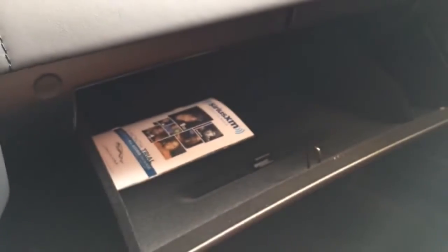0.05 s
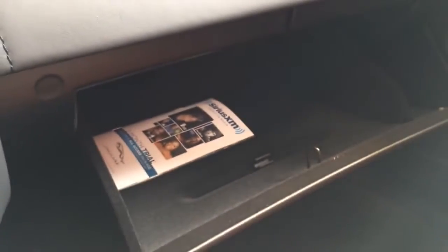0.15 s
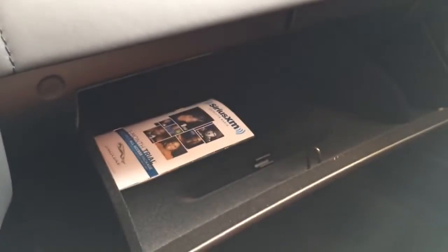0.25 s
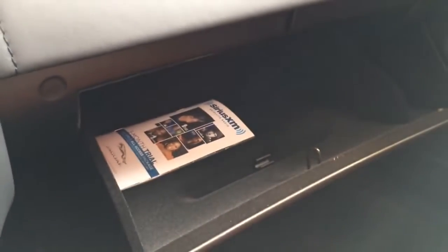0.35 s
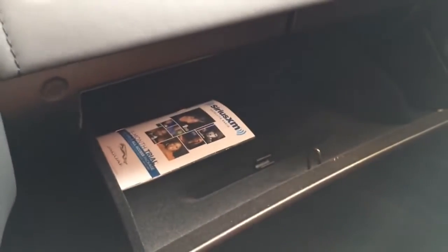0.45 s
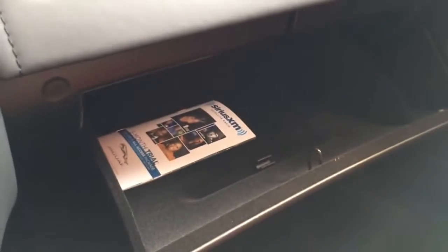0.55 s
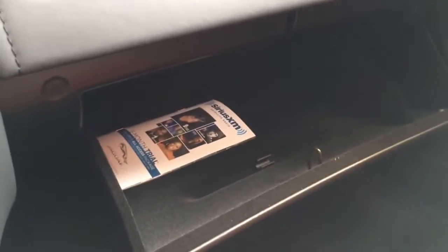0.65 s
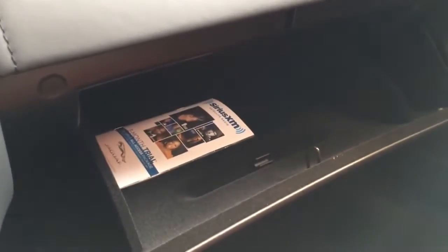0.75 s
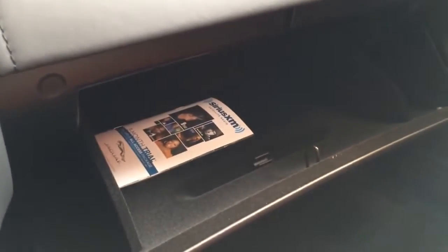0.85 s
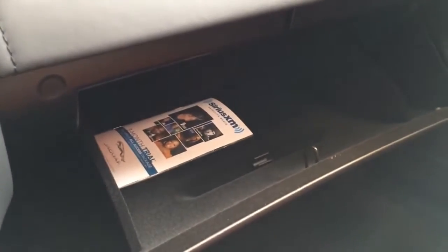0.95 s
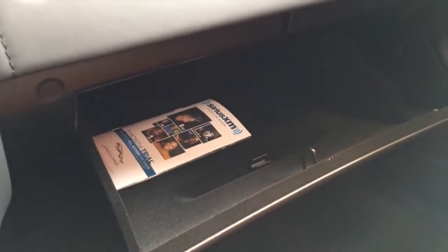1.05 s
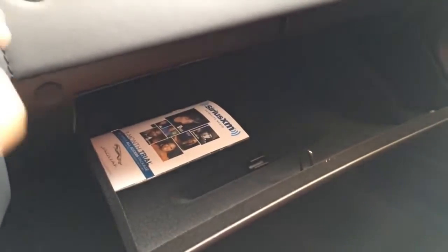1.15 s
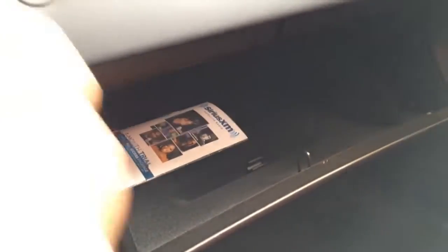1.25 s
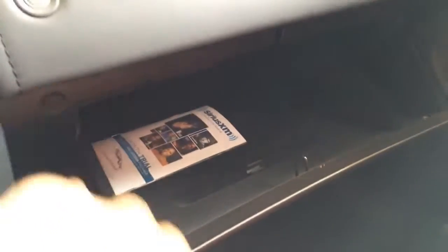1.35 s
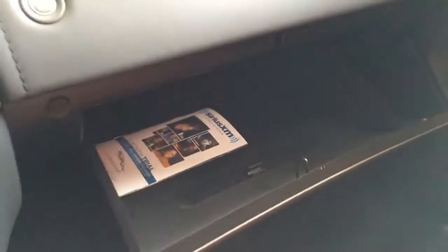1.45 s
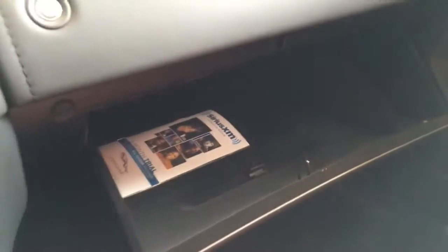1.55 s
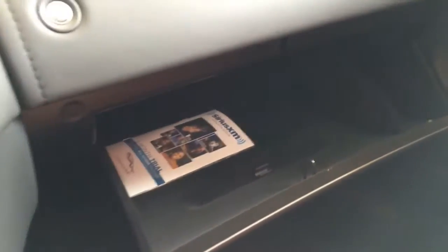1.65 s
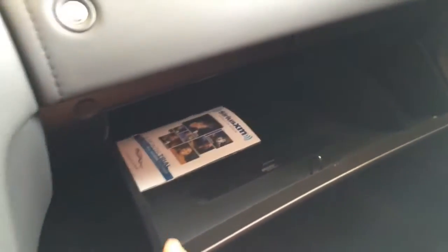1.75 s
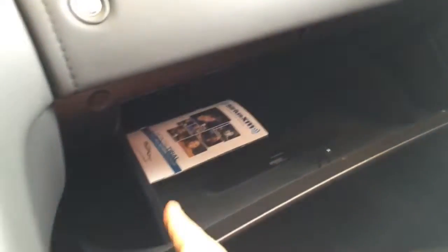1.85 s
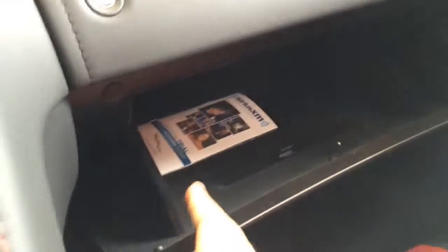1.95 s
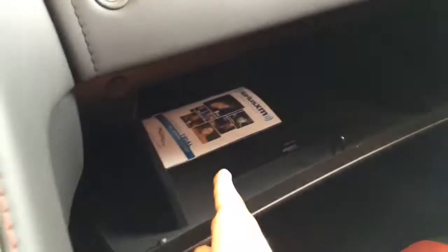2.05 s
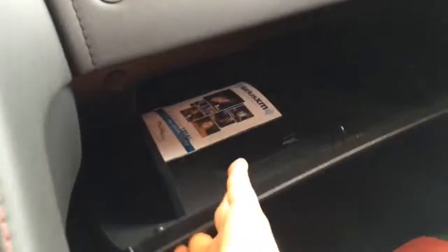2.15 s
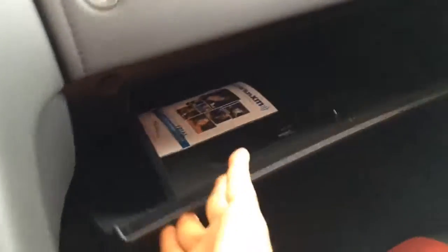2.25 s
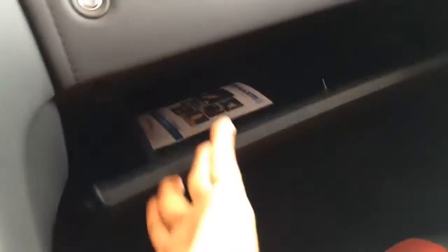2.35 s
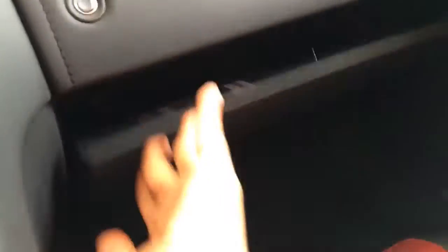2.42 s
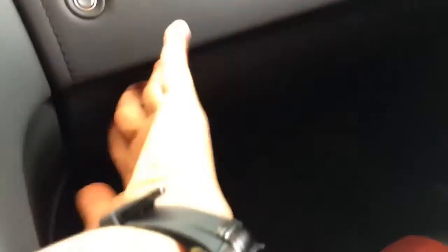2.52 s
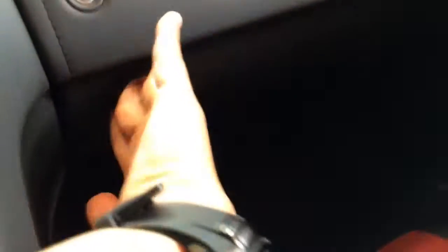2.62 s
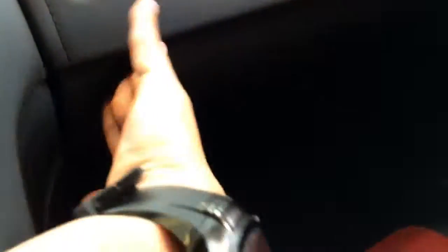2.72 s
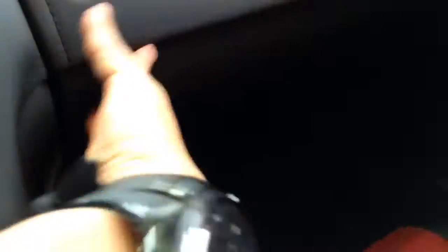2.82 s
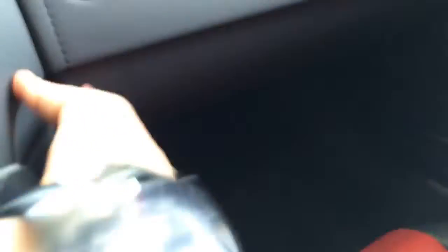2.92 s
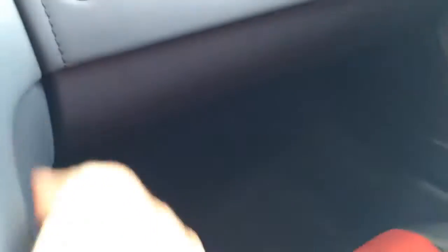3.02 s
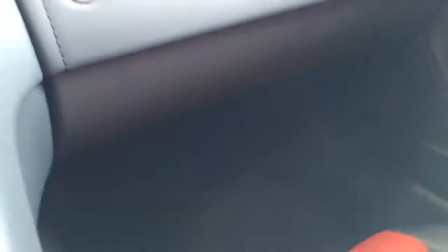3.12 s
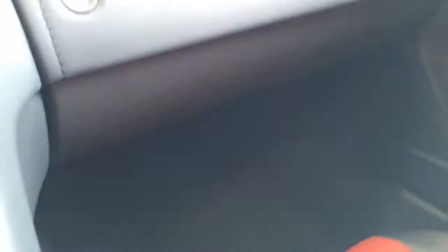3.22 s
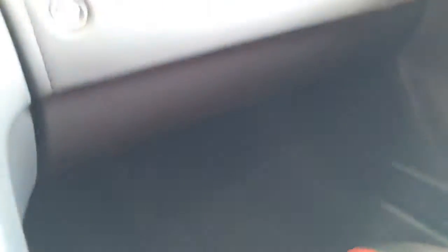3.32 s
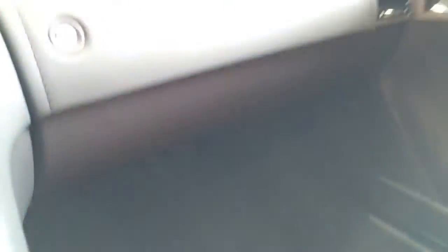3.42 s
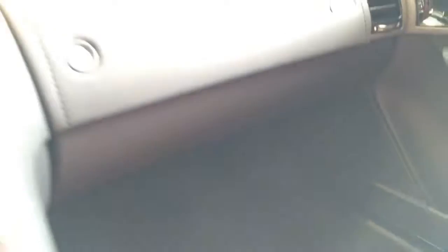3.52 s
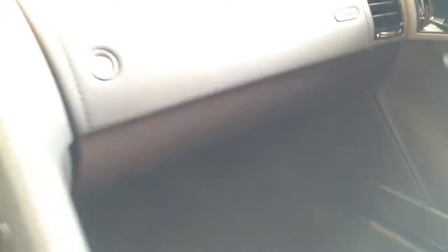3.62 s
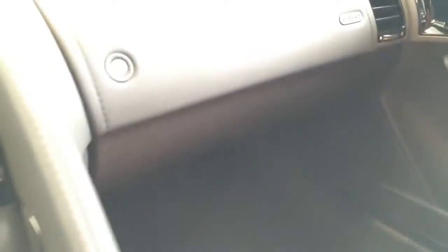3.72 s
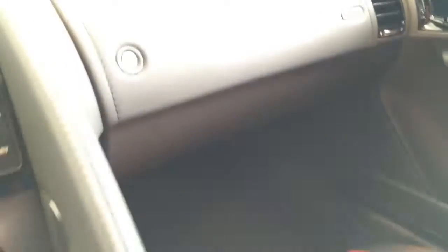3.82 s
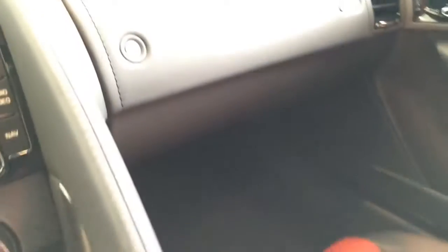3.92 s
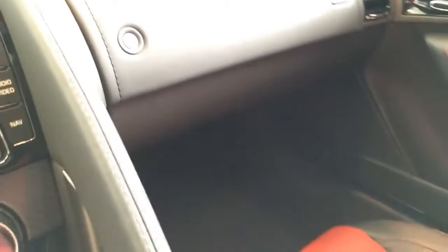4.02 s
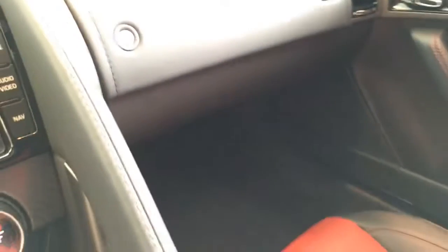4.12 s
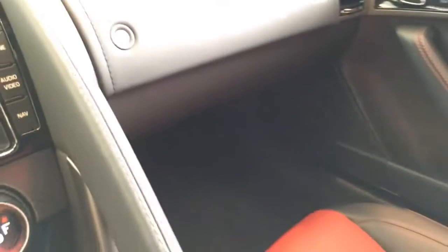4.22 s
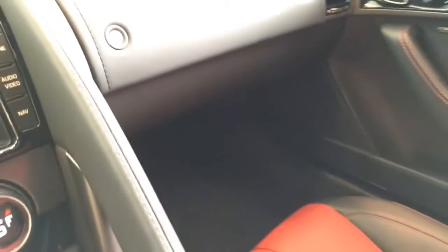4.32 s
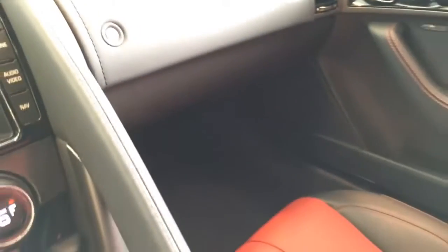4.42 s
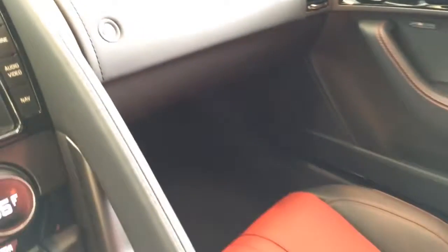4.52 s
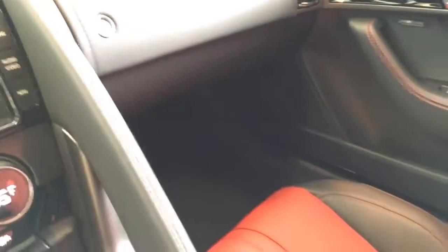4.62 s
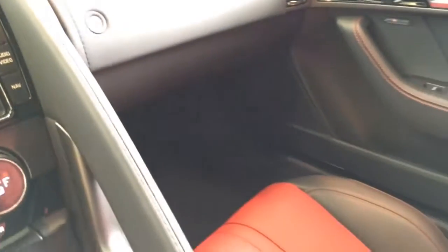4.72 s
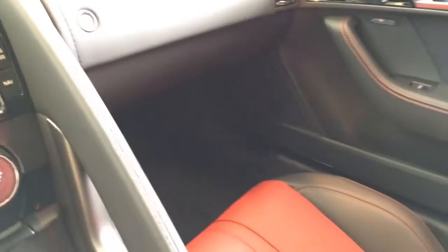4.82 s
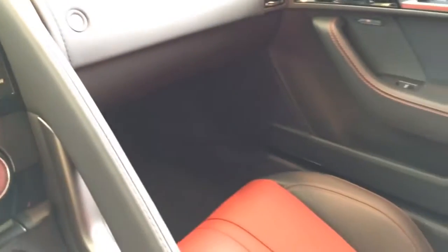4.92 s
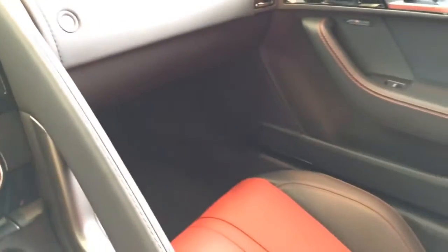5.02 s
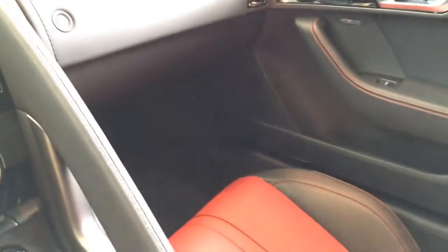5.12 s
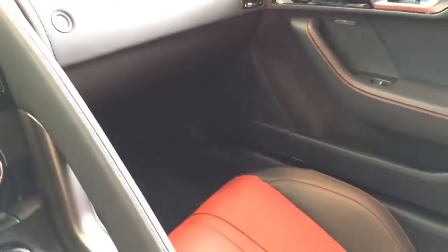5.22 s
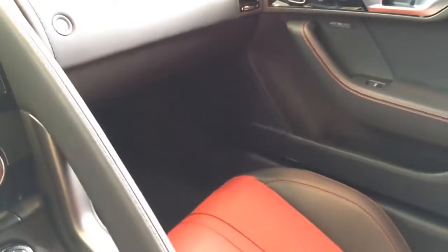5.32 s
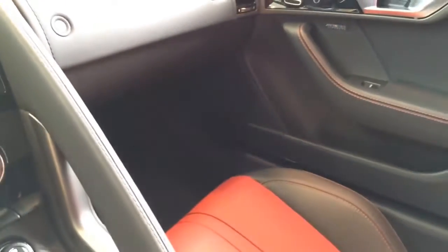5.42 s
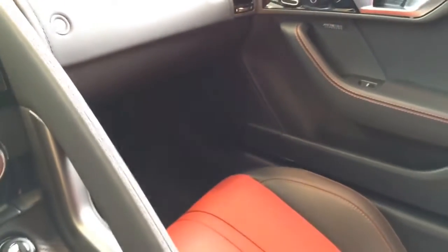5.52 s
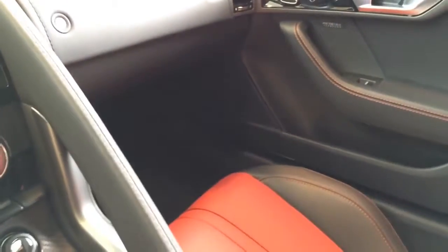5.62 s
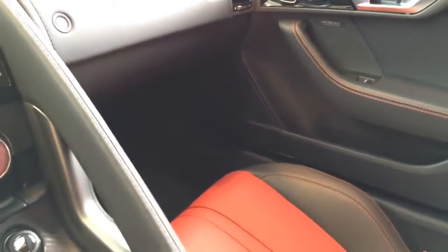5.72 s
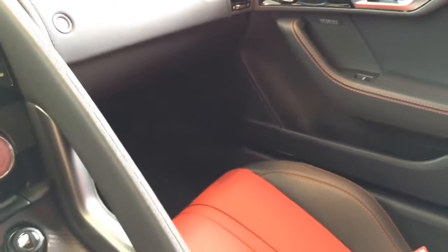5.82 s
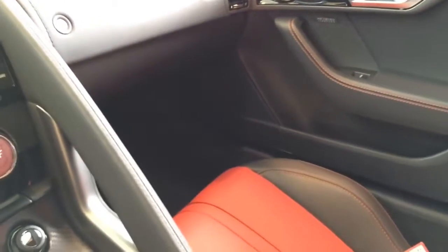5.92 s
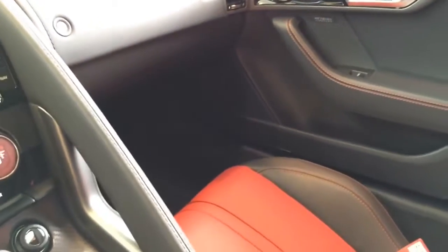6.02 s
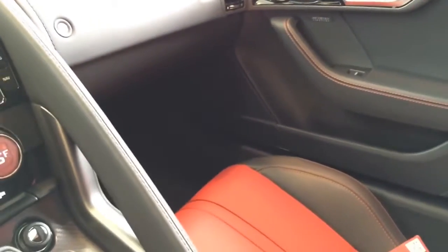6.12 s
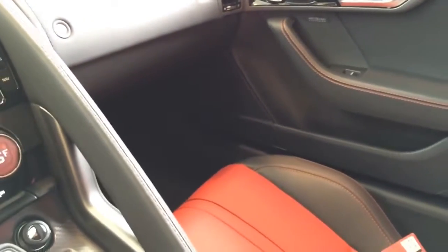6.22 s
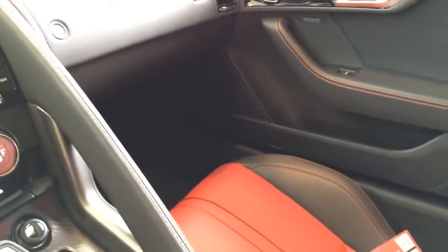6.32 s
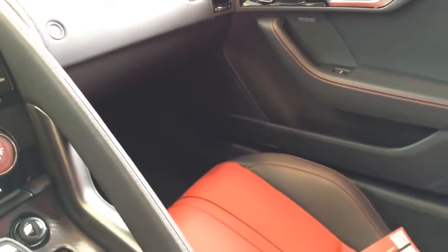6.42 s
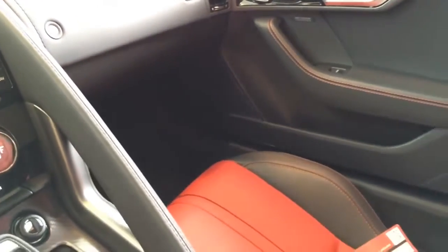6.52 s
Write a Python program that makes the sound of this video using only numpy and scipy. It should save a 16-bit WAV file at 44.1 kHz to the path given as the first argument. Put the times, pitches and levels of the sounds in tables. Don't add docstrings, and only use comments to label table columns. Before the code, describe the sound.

A close handheld microphone in a small, padded car interior picks up faint rumble and hiss. Cloth rubs, low soft bumps and plastic ticks follow, then one loud glove box closing: quick metallic latch chatter merged with a woody thud. Things inside hop for a fraction of a second. Rustling fades away, a lone bump follows, then small dry creaks and near silence.

```python
import sys
import numpy as np
from scipy import signal
from scipy.fft import rfft, irfft, next_fast_len
from scipy.io import wavfile
from scipy.ndimage import map_coordinates

SR = 44100
rng = np.random.default_rng(int(sys.argv[2]) if len(sys.argv) > 2 else 0)


def log_audio(samples):
    frames = np.atleast_2d(samples).T
    limited = np.clip(frames, -1, 1)
    pcm = np.round(limited * 32767).astype(np.int16)
    wavfile.write(sys.argv[1], SR, pcm)


def volts_from_decibels(level):
    exponent = np.asarray(level, float) / 20
    return 10 ** exponent


N = 289398


def unit(x):
    return x / np.sqrt(np.mean(x ** 2) + 1e-20)


def along(points, hz):
    f, v = np.transpose(points)
    return np.interp(np.log(hz + 1), np.log(f + 1), v)


def wobble(rate):
    knots = rng.standard_normal(int(N * rate / SR) + 4)
    return map_coordinates(knots, [np.arange(N) * rate / SR])


def filtered(x, response):
    m = next_fast_len(N + SR // 2)
    return irfft(rfft(x, m) * response(np.fft.rfftfreq(m, 1 / SR)), m)[:N]


def body(peaks):
    def response(f):
        total = 0
        for k, (hz, width, db) in enumerate(peaks):
            peak = 1j * f * width / (hz * hz - f * f + 1j * f * width)
            total = total + (-1) ** k * volts_from_decibels(db) * peak
        return total
    return response


def band(x, hz, spread):
    pole = np.exp(-np.pi * spread * hz / SR)
    return signal.lfilter([1, -1], [1, -2 * pole * np.cos(2 * np.pi * hz / SR), pole ** 2], x)


def narrow(x, hz, spread):
    return unit(band(band(x, hz, spread), hz, spread))


def ring(hz, db, t60, attack, t):
    return volts_from_decibels(db - 60 * t / t60) * np.sin(2 * np.pi * hz * t) * (1 - np.exp(-t / attack))


def dying(level_db, t60):
    hz, t, z = signal.stft(rng.standard_normal(SR // 2), SR, nperseg=128)
    fade_db = along(level_db, hz)[:, None] - 60 * t / along(t60, hz)[:, None]
    tail = signal.istft(z * volts_from_decibels(fade_db), SR, nperseg=128)[1]
    return tail / np.linalg.norm(tail)


def add(track, s, sound):
    track[round(s * SR):][:len(sound)] += sound


def grainy(grain_db, rate):
    return rng.standard_normal(N) * volts_from_decibels(grain_db * wobble(rate))


def stroke(start, peak, stop, db):
    u = np.interp(np.arange(N) / SR, [start, peak, stop], [0, 1, 2])
    bend = np.where(u < 1, 1.23, 0.54)
    return volts_from_decibels(db) * np.abs(np.sin(np.pi * u / 2)) ** bend * (u < 2)


def contacts(events, t60):
    out, t = np.zeros(N + SR), np.arange(SR // 8) / SR
    for s, db, hz, snap_db, snap_hz in events:
        scrape, snap = rng.standard_normal((2, len(t)))
        fade = volts_from_decibels(-60 * t / t60)
        rough = narrow(scrape, hz, 0.81) + 0.103 * narrow(scrape, 2 * hz, 0.79)
        clean = np.sin(2 * np.pi * hz * t)
        knock = (0.81 * rough + 0.92 * clean) * fade * (1 - np.exp(-t / 0.00053))
        bright = narrow(snap, snap_hz, 0.49) * (volts_from_decibels(-60 * t / 0.0047) + 0.48 * fade)
        add(out, s, volts_from_decibels(db - 7.5) * (knock + volts_from_decibels(snap_db) * bright))
    return out[:N]


def cabin():
    # pitch_hz [Hz], level_db [dB per Hz]
    quiet = [(12, -27.5), (24, 0.5), (49, -0.5), (86, -7), (110, -6.5), (150, -7.5), (190, -4), (228, -9.5),
             (260, -6.5), (300, -19.5), (340, -19), (558, -19.5), (678, -24.5), (1290, -29), (1400, -28.5),
             (1810, -33), (8180, -40.5), (16000, -49.5)]
    # time_s [s], level_db [dB]
    outside = [(0, -60), (.3, -63.5), (.5, -59.5), (.65, -61), (.85, -57), (1.15, -62.5), (1.55, -59.5),
               (2.5, -61.5), (2.92, -55.5), (3.22, -64), (3.55, -58), (3.95, -63), (4.3, -60), (4.8, -59),
               (5, -63.5), (5.4, -60), (5.7, -62.5), (6.56, -61)]
    # start_s [s], strongest_s [s], stop_s [s], level_db [dB]
    whines = [
        (.185, .2, .22, -65),
        (.275, .3, .36, -65),
        (.43, .445, .46, -70),
        (.51, .53, .55, -72),
        (.585, .6, .615, -67),
    ]
    sway_rate = 4.18
    swell_db = np.interp(np.arange(N) / SR, *np.transpose(outside))
    swell_db = swell_db - swell_db.mean()
    deep_gain = volts_from_decibels(-56 + swell_db + 0.5 * wobble(sway_rate))
    drone_gain = volts_from_decibels(-60.5 + 0.2 * swell_db + 2 * wobble(sway_rate))
    air = unit(filtered(rng.standard_normal(N), lambda hz: volts_from_decibels(along(quiet, hz))))
    deep = filtered(air, lambda hz: 1 / (1 + (hz / 110) ** 4))
    low = filtered(air, lambda hz: 1 / (1 + (hz / 380) ** 4))
    tone = np.sin(2 * np.pi * 1421 * np.arange(N) / SR + 0.38 * wobble(17.5))
    whine = sum(stroke(*row) for row in whines) * tone
    return deep_gain * unit(deep) + drone_gain * unit(low - deep) + volts_from_decibels(-51.5) * (air - low) + whine


def sleeve():
    # start_s [s], fastest_s [s], stop_s [s], level_db [dB], hiss_over_weave_db [dB]
    strokes = [(0.98, 1.165, 1.32, -60, -5), (1.13, 1.315, 1.374, -59, 9), (1.494, 1.505, 1.57, -63, 3),
               (1.53, 1.66, 1.75, -62, -6), (1.795, 1.92, 2.19, -68.5, -4), (1.992, 2.047, 2, -83, 8),
               (2.36, 2.484, 2.7, -63.5, -4.5), (2.548, 2.566, 2.573, -55, -9),
               (2.855, 2.905, 2.99, -63.5, -18), (2.989, 2.985, 3.05, -71, 2.5),
               (3.153, 3.154, 3.252, -62, -2.5), (3.18, 3.31, 3.39, -60, -2.5),
               (3.336, 3.408, 3.5, -69, -11), (3.452, 3.545, 3.72, -61.5, -14),
               (3.54, 3.77, 3.912, -63, -7), (3.88, 3.93, 4.1, -73, -28)]
    # pitch_hz [Hz], level_db [dB per Hz]
    fibre = [(3530, -28), (6000, -8.5), (9310, -2.5), (14300, -4), (15300, -4.5), (15500, -34.5)]
    # pitch_hz [Hz], width_hz [Hz], level_db [dB]
    pattern = [(2780, 940, 0.5), (4200, 1100, 1.5), (6010, 4100, -4)]
    # pitch_hz [Hz], width_hz [Hz], level_db [dB]
    seat = [(1010, 490, -1), (1450, 200, 4), (1900, 520, 4)]
    gains = np.zeros((3, N))
    for *row, hiss_db in strokes:
        seat_db = -3.5 - 0.14 * hiss_db
        gains += stroke(*row) * volts_from_decibels([[hiss_db], [0], [seat_db]])
    catches = np.array([wobble(28) for _ in range(3)])
    hiss, rasp, swish = gains * volts_from_decibels(1.14 * catches)
    fibres = unit(filtered(grainy(0.88, 700), lambda hz: volts_from_decibels(along(fibre, hz))))
    weave = unit(filtered(grainy(0.5, 400), lambda hz: body(pattern)(hz) * hz ** 2 / (hz ** 2 + 2000 ** 2)))
    leather = unit(filtered(grainy(1.8, 200), lambda hz: body(seat)(hz) / (1 + (hz / 3000) ** 2)))
    return hiss * fibres + rasp * weave + swish * leather


def folds():
    # start_s [s], end_s [s], pitch_hz [Hz], width_hz [Hz], level_db [dB]
    creases = [(1.197, 1.263, 1780, 200, -68), (1.235, 1.285, 1450, 200, -64),
               (1.302, 1.34, 4270, 300, -60), (1.315, 1.365, 5300, 350, -59),
               (1.315, 1.368, 2160, 200, -63), (1.59, 1.8, 2750, 300, -65.5),
               (1.77, 1.87, 1900, 700, -65.5), (1.44, 1.6, 270, 92, -59.5), (5.82, 6.1, 260, 90, -60.5),
               (3.41, 3.45, 316, 162, -60), (1.578, 1.83, 1900, 1200, -62.5), (1.605, 1.85, 1514, 130, -62),
               (1.978, 2.045, 340, 74.07, -57.5), (3.15, 3.24, 4200, 348, -65),
               (3.209, 3.33, 2900, 400, -62), (3.21, 3.34, 1300, 555.6, -62), (3.33, 3.392, 1600, 300, -67),
               (3.15, 3.19, 1700, 900, -65), (3.35, 3.392, 3900, 599, -61.5),
               (3.501, 3.584, 1900, 298, -71), (3.64, 3.85, 1990, 302, -66.5),
               (3.979, 4.463, 1815, 1500, -68.5), (4.619, 5.046, 1980, 1600, -70),
               (1.354, 1.5, 2020, 120, -76), (2.432, 2.5, 1100, 700, -62), (5.284, 5.305, 600, 400, -59),
               (5.766, 5.832, 620, 119, -61), (5.858, 5.9, 570, 119.5, -61.5)]
    out = np.zeros(N)
    for start, end, hz, width_hz, db in creases:
        swell = np.sin(np.linspace(0, np.pi, round((end - start) * SR))) ** 0.69
        rub = narrow(rng.standard_normal(len(swell)), hz, 1.2 * width_hz / hz)
        add(out, start, volts_from_decibels(db - 1.5) * swell * rub)
    return out * volts_from_decibels(2.5 * wobble(60))


def lid_ticks():
    # time_s [s], peak_db [dB], pitch_hz [Hz], snap_db [dB], snap_hz [Hz]
    touches = [(1.4958, -55, 1100, -4, 11750), (1.752, -45, 620, -12, 1500), (1.7794, -39, 1060, -14, 2760),
               (1.787, -48, 600, -3, 2000), (2.0093, -44, 930, -10, 7080), (2.148, -46.5, 704, -14, 2020),
               (2.2132, -46, 1190, -4, 2670), (2.246, -42.5, 800, -11, 2500), (2.4354, -42, 699, -15, 2000),
               (2.441, -43, 930, -15, 2020), (2.462, -36, 790, -16, 1500), (2.468, -39, 976, -12, 1800),
               (2.473, -37.5, 790, -10.5, 2500), (2.479, -42.5, 900, -14, 1800),
               (2.512, -44.5, 1397, -8, 2300), (2.559, -37, 803, -9.5, 2000), (2.455, -47, 1203, -13, 2290),
               (2.5064, -42.5, 910, -12.5, 2400), (2.661, -58, 6000, 11.5, 11000),
               (2.778, -66, 5000, 2.5, 8850), (2.9032, -47.5, 945, -1, 2785),
               (2.9877, -49, 1570, -2, 11500), (3.0025, -55, 3800, 8, 3860), (5.136, -49.5, 674, -22, 1200),
               (5.29, -46, 500, -22, 1000), (4.3513, -45.5, 972, -1, 2700)]
    return contacts(touches, 0.045)


def swing():
    # start_s [s], fastest_s [s], stop_s [s], boom_db [dB], rattle_over_boom_db [dB]
    nudges = [
        (1.62, 1.788, 1.95, -44, -16),
        (1.918, 2, 2, -46, -26),
        (1.976, 2.017, 2.09, -53.5, -14.5),
        (2.143, 2.148, 2.29, -50, -13),
        (2.206, 2.3, 2.36, -48, -13),
        (2.27, 2.48, 2.51, -51.5, -2.5),
        (2.41, 2.565, 2.57, -43, -11),
        (2.613, 2.626, 2.75, -52.5, 1),
        (2.633, 2.65, 2.88, -44.5, -12.5),
        (2.774, 2.773, 2.4, -70, -7),
    ]
    # pitch_hz [Hz], width_hz [Hz], level_db [dB]
    lid = [(59.6, 29.4, 3), (101, 31, 2), (147, 52.4, 1.5), (208, 35, -2.5), (270, 38, -21.5)]
    # pitch_hz [Hz], width_hz [Hz], level_db [dB]
    loose = [(392, 66, 10), (523, 140, 1.5), (707, 230, 2), (1100, 340, -6)]
    boom, shake = sum(stroke(*row) * volts_from_decibels([[0], [rattle_db]]) for *row, rattle_db in nudges)
    hollow = unit(filtered(grainy(1.1, 30), body(lid)))
    rattle = unit(filtered(grainy(2.086, 160), body(loose)))
    return boom * hollow + shake * rattle


def bumps():
    # time_s [s], level_db [dB], pitch_hz [Hz], knock_db [dB]
    pushes = [(1.705, -33.5, 119, -28), (1.752, -28, 140, -9), (1.806, -38, 152, -27),
              (1.839, -26.5, 97, -20), (1.865, -24.5, 105, -29), (1.93, -29.5, 79, -30),
              (1.975, -35, 125.4, -28), (2.021, -47, 130, -12), (2.112, -39.5, 111, -14),
              (2.15, -56, 141, -8), (2.173, -40, 163, -31), (2.2139, -41.5, 210, 4),
              (2.2203, -27, 104.2, -28), (2.246, -34, 128.8, -6), (2.271, -42, 119, -28),
              (2.467, -38.5, 139, -1), (2.519, -35, 135, -20), (2.545, -41, 135, -20),
              (2.644, -28, 87, -34), (2.704, -25.5, 132, -28), (2.739, -34.5, 235, -13),
              (2.8, -37, 221, -25), (2.95, -43.5, 164, -6), (4.349, -33.5, 131, -18),
              (5.163, -40.5, 115, -17), (5.371, -41, 80, -31), (5.776, -43.5, 150, -18),
              (5.803, -44, 157.7, -16), (5.83, -40, 159, -9.5), (5.86, -44, 166.4, -14.5)]
    out, t = np.zeros(N + SR), np.arange(SR // 3) / SR
    for s, db, hz, knock_db in pushes:
        knock = ring(522, knock_db, 0.047, 0.0011, t) + ring(372.0, knock_db - 2.5, 0.047, 0.0012, t)
        push = ring(hz, 3.16, 0.093, 0.0023, t)
        add(out, s, volts_from_decibels(db) * (knock - push))
    return out[:N]


def slam():
    # time_s [s], level_db [dB], treble_db [dB], lid_knock_db [dB]
    chatter = [
        (2.564, -43.5, 8, -12.5),
        (2.5695, -9.5, 0.5, -15),
        (2.5725, -5.5, 5, -1.5),
        (2.5755, -12.5, -14.5, 8.5),
        (2.578, -10.5, -2, 6.5),
        (2.5815, -15, -25.5, 11),
        (2.587, -21, -18, 6.5),
        (2.591, -30, -4.5, 17.5),
    ]
    # pitch_hz [Hz], level_db [dB], t60_s [s]
    latch = [(1005, 3, 0.045), (1610, 5, 0.028), (2010, -0.5, 0.02395), (2970, -12, 0.011),
             (3277, -0.5, 0.025), (3850, -7, 0.0313), (5160, -5, 0.017), (5960, -12, 0.0316),
             (7400, -10.5, 0.016), (8450, -11, 0.034), (9250, -13, 0.025), (10840, -21.5, .02)]
    # pitch_hz [Hz], level_db [dB], t60_s [s]
    panel = [(40, -11, 0.03), (64, -11, 0.14), (78, -12, 0.22), (95.4, -8.5, 0.154), (121, -8.5, 0.089),
             (163.6, 0.3, 0.042), (204, -13, 0.13), (287.6, -3.5, 0.033), (365.5, -16.5, 0.085),
             (505, -35.1, 0.14)]
    # pitch_hz [Hz], level_db [dB], t60_s [s]
    skin = [(564, -32.5, 0.18), (729, -24.5, 0.14), (945, -21, 0.094), (1174, -24, 0.059),
            (1143, -21.5, 0.085), (1352, -47.5, 0.17), (1590, -38, 0.078), (1900, -38.5, 0.086)]
    # time_s [s], level_db [dB]
    shudder = [
        (2.5695, -15.5),
        (2.592, -29.5),
        (2.611, -42),
    ]
    # pitch_hz [Hz], level_db [dB], t60_s [s]
    dash = np.array([(246.8, -8, 0.16), (550, -1.5, 0.17), (1000, -5.5, 0.16), (2100, -2, .11),
                     (3300, -13.5, 0.13), (5000, -14, 0.076), (8560, -14, 0.054), (12100, -31.5, 0.09),
                     (15500, -33, 0.079)])
    shut_s, puff_s = 2.5928, 0.018
    out, t = np.zeros(N + SR), np.arange(SR // 2) / SR
    for s, db, treble_db, knock_db in chatter:
        pawl = 0
        for hz, level_db, t60 in latch:
            tilt_db = treble_db * np.log2(hz / 1000) / 3 + 4 * rng.standard_normal()
            pawl = pawl + ring(hz, level_db + tilt_db, t60, 0.00022, t)
        knock = ring(422, knock_db, 0.11, 0.00023, t) + ring(354, knock_db - 5.5, 0.034, 0.0002, t)
        knock += ring(238.1, knock_db + 5, 0.059, 0.00096, t) + ring(772, knock_db, 0.032, 0.000645, t)
        add(out, s, volts_from_decibels(db - 15.0) * (pawl + knock))
    puff = np.sin(np.linspace(0, np.pi, round(puff_s * SR)))
    add(out, shut_s - puff_s, volts_from_decibels(-18) * puff)
    add(out, shut_s, -sum(ring(hz, db + 1, t60, 0.0028, t) for hz, db, t60 in panel))
    add(out, shut_s, -sum(ring(hz, db, t60, 0.00073, t) for hz, db, t60 in skin))
    for s, db in shudder:
        add(out, s, volts_from_decibels(db + 24) * dying(dash[:, :2], dash[:, ::2]))
    return out[:N]


def settling():
    # time_s [s], peak_db [dB], pitch_hz [Hz], snap_db [dB]
    bounces = [(2.617, -31, 1800, -17), (2.626, -34, 1000, -14), (2.665, -32.5, 1650, -7.5),
               (2.668, -31, 1070, -7), (2.674, -37, 1500, -6), (2.689, -35, 1280, -14),
               (2.696, -37.5, 1100, -12), (2.6995, -31, 870, -16), (2.705, -38, 1000, -18),
               (2.712, -37, 750, -20), (2.7305, -41, 1900, -14), (2.735, -28, 750, -19),
               (2.738, -46, 1600, -16), (2.746, -39, 940, -20), (2.754, -42, 840, -22),
               (2.7759, -40, 1130, -16), (2.781, -53, 1900, -17), (2.787, -46, 900, -20),
               (2.806, -56, 790, -20), (2.822, -53, 760, -20)]
    # pitch_hz [Hz], width_hz [Hz], level_db [dB]
    contents = [(425, 49, -12), (716, 60, -0.5), (973, 84, -4), (1292, 68, 0), (1600, 90, -2.5),
                (1790, 97, 2), (2000, 170, -2.5), (2500, 210, -1), (3300, 570, -13)]
    landings = contacts([(*row, 3300) for row in bounces], 0.032)
    edges = np.zeros(N)
    for s, db, _, snap_db in bounces:
        edges[round(s * SR)] = volts_from_decibels(db + snap_db / 2 + 18)
    edges = filtered(edges, lambda hz: 1 / (1 + 1j * hz / 3500))
    return volts_from_decibels(3.5) * filtered(landings + edges, body(contents)) + 0.44 * landings


def trim():
    # time_s [s], peak_db [dB], pitch_hz [Hz], snap_db [dB], snap_hz [Hz]
    creaks = [(5.134, -40, 1500, -6, 3300), (5.138, -37.5, 1550, -5, 5480), (5.144, -38.5, 1596, -5, 2900),
              (5.15, -39, 1600, -9, 2900), (5.218, -50, 1100, 0, 3300), (5.285, -44.5, 1720, -4, 8800),
              (5.289, -52, 2300, -10, 3500), (5.293, -41, 1740, -11, 3000), (5.299, -43, 1710, -15, 3000),
              (5.336, -54, 2100, -20, 5000), (5.339, -48.5, 1860, -20, 4000),
              (5.3425, -41, 1500, -25, 3000), (5.351, -57, 1200, -20, 2500), (5.409, -41, 2100, 10, 11300),
              (5.4105, -35.5, 1280, -5, 4870), (5.421, -47, 1490, -4, 4000)]
    # pitch_hz [Hz], width_hz [Hz], level_db [dB]
    shell = [(656, 280, -0.5), (1060, 370, 2.5), (1500, 126, 0), (1900, 190, 1.5), (2350, 340, -4.5),
             (2950, 370, 1.5), (3680, 720, -5.5), (5000, 440, 1.5), (7140, 1800, -11.5), (11300, 2500, -1)]
    slips = contacts(creaks, 0.03)
    return volts_from_decibels(5.5) * filtered(slips, body(shell)) + 0.5 * slips


def interior(x):
    # pitch_hz [Hz], t60_s [s]
    echo = [(100, 0.52), (500, 0.09), (2000, 0.081), (6000, 0.0651), (14000, 0.22)]
    delayed = np.pad(x, (130, 0))
    return signal.fftconvolve(delayed, dying([(100, 0)], echo))[:N]


def scene():
    shut = slam()
    taps = lid_ticks() + bumps() + settling() + trim()
    hits = shut + volts_from_decibels(-17.0) * interior(shut) + taps + volts_from_decibels(-16.0) * interior(taps)
    return (cabin() + sleeve() + folds() + swing() + hits)[None]


def top_cut(x):
    return signal.sosfilt(signal.butter(12, 16410, fs=SR, output="sos"), x)


def record(dry):
    def colour(hz):
        bass_cut = (1j * hz / (1j * hz + 28)) ** 2
        return bass_cut / (1 + (hz / 15600) ** 60)
    mix = filtered(dry[0], colour)[None]
    return top_cut(mix)


dry = scene()
out = record(dry)
log_audio(out)
```